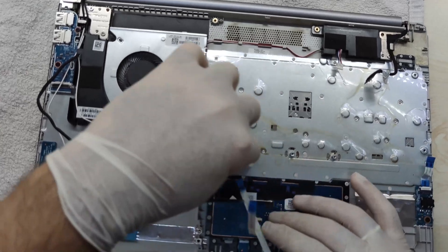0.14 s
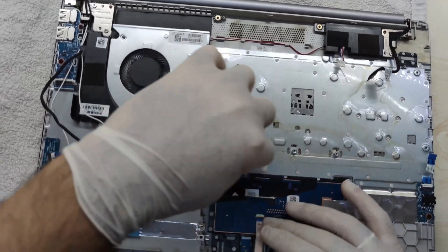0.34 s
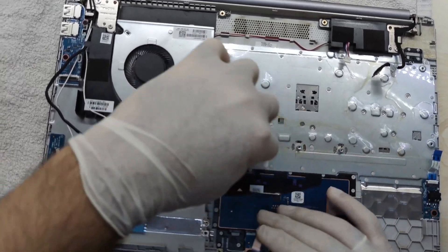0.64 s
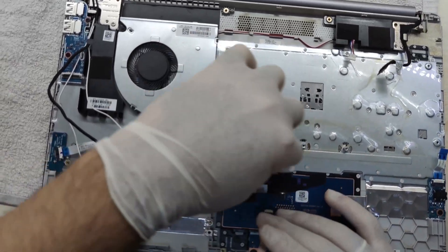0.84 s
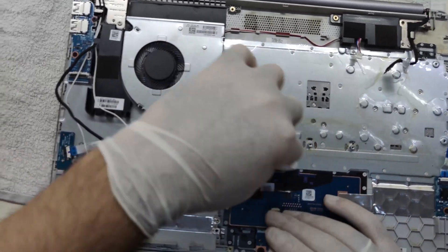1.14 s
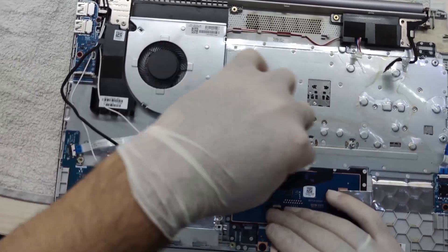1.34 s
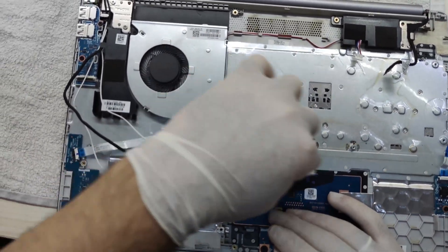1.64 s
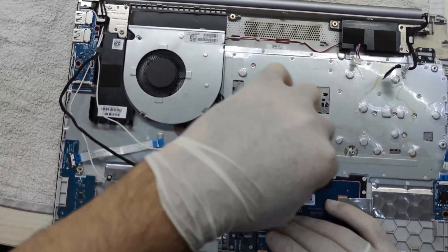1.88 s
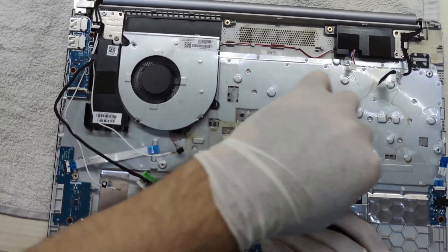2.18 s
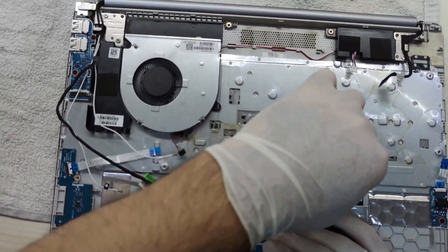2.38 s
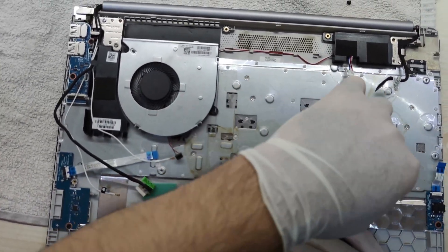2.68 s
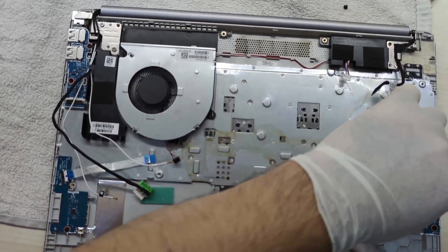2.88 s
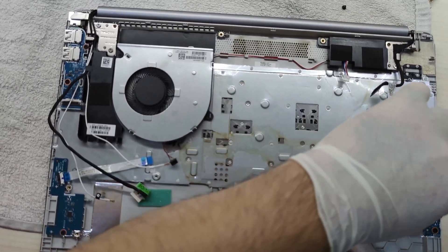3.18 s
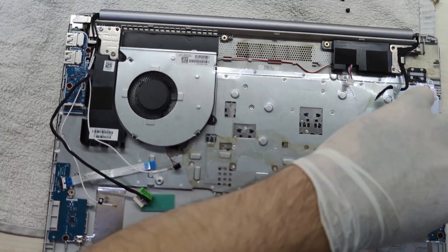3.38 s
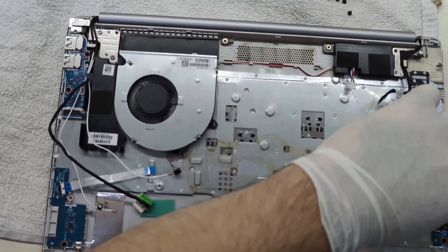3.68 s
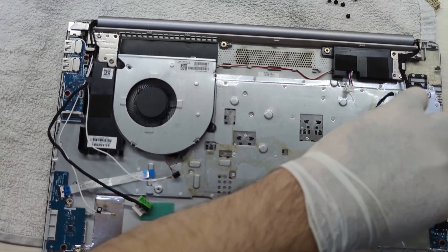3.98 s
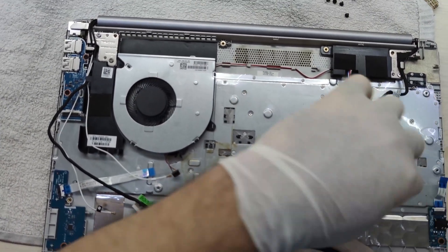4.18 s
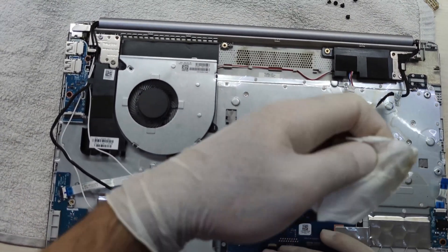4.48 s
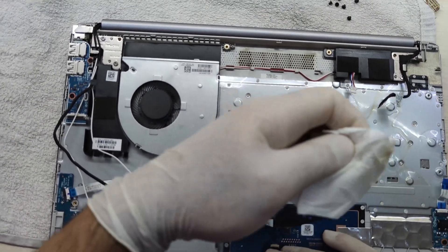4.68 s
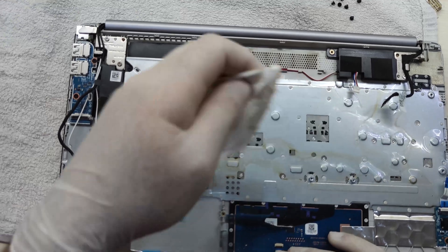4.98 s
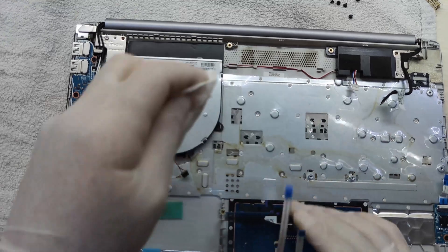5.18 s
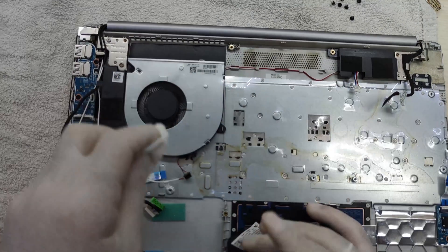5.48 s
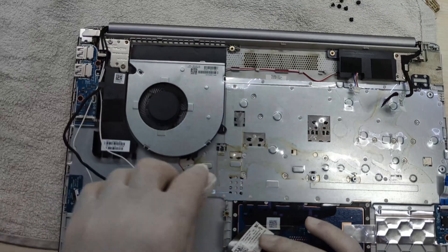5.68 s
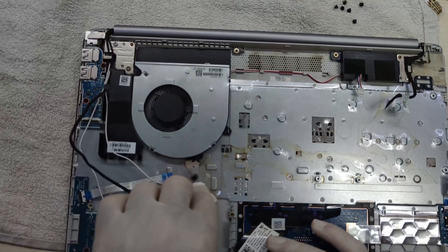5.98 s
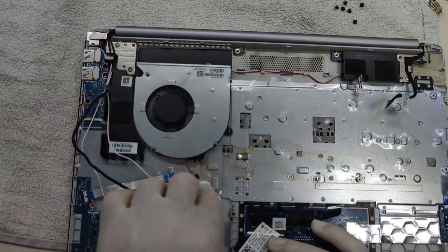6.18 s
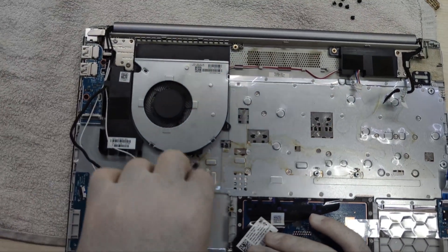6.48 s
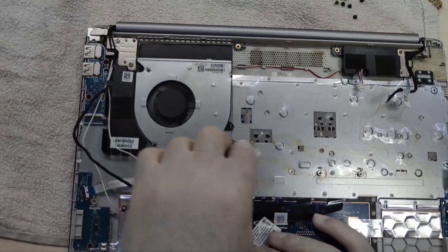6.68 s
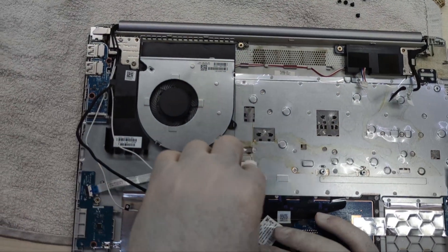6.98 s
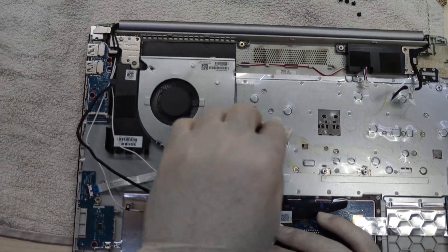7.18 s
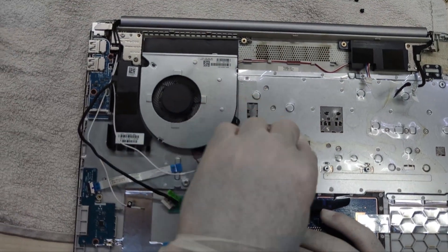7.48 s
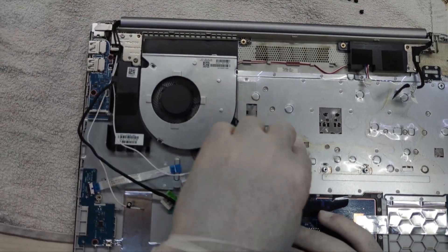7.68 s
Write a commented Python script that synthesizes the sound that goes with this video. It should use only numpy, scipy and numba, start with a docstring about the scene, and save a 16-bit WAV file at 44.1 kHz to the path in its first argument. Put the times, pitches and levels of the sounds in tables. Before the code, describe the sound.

Close above a workbench in a small dry room, a gloved hand scrubs a thin metal plate with a wipe: rapid, bright, hissy strokes, about seven per second, fading after three and a half seconds. Then come irregular clicks, short scrapes and faint glove crinkles, with a sharp loud knock near five seconds and another past six and a half. A few very soft wipes finish it over faint hum and air.

```python
"""Quick back-and-forth strokes hiss first: a gloved hand scrubs a laptop keyboard's metal backplate with a wipe.
Then it handles the open case on a workbench: keys and small parts click and scrape, before a few last strokes.
The wipe is noise made of tiny friction grains, swept by a moving resonance; contacts are short noise bursts
that ring each part and the thin chassis. Glove ticks and soft bumps add to them.
Two microphone ports close above hear it in a small dry room with a faint hum and air noise."""
import sys
import numpy as np
from scipy import signal
from scipy.fft import rfft, irfft, next_fast_len
from scipy.io import wavfile
from numba import njit

SR = 44100
rng = np.random.default_rng(int(sys.argv[2]) if len(sys.argv) > 2 else 0)


def store_wav(level_fs):
    """Save 16-bit WAV to argv[1]."""
    pcm = np.round(np.clip(np.atleast_2d(level_fs), -1, 1) * 32767)
    wavfile.write(sys.argv[1], SR, pcm.T.astype(np.int16))


N = 345728  # length in samples
SIDES = np.array([[1], [-1]])  # left, right

# Wipe strokes, back and forth: t/s, length/s, hiss level/dB before the swell,
# direction (above 0 push, below 0 pull; its size says how strongly)
STROKES = [(0.0, 0.083, -53.5, 0.84), (.104, 0.12, -59, -0.74), (.23, .11, -49, 1),
           (.366, 0.083, -47.5, -0.24), (.485, 0.096, -52, 0.89), (.634, .1, -46.5, 0.48),
           (.764, .095, -50, 0.52), (.911, .1, -45, 0.0062), (1.042, 0.11, -45, 0.14),
           (1.194, 0.12, -42, -0.83), (1.33, .13, -44, 0.77), (1.503, .11, -46, -1.5),
           (1.643, .13, -47.5, 1), (1.818, 0.074, -63.5, -0.86), (1.923, .13, -54, 1),
           (2.199, .15, -49, 0.75), (2.381, 0.098, -50.5, -0.68), (2.503, .15, -46, 1),
           (2.689, 0.1, -49, -1.4), (2.797, 0.15, -47.5, 0.93), (2.972, 0.093, -45, -1.2),
           (3.118, .11, -42, 0.026), (3.251, 0.097, -50.5, -0.18), (3.393, 0.083, -57.5, 0.74),
           (3.519, 0.095, -64, -1), (3.646, 0.094, -61.5, 0.33), (3.779, 0.092, -66.5, -0.41),
           (3.884, 0.092, -67, 0.77), (4.028, 0.115, -62.5, -1), (4.11, 0.15, -59, 1),
           (7.43, .11, -61.5, -1), (7.556, 0.12, -66, 1), (7.652, .095, -60, -0.64),
           (7.747, 0.23, -58.5, 0.69)]
# The grip and the spot being wiped tune the hiss: t/s, mid-stroke centre f/Hz,
# lower edge f/Hz before the push shift, singing at that edge level/dB,
# drag f/Hz, drag level/dB at usual effort
GRIP = [(.05, 7750, 4430, 1, 3400, -66), (.3, 7530, 3800, 2.5, 2780, -65), (.55, 7630, 3120, -9, 1530, -73),
        (1.25, 7760, 3180, 1, 1290, -69), (1.55, 7340, 4300, -8, 1180, -64),
        (1.8, 7500, 3720, 3, 1210, -61), (2.27, 8470, 5150, 4, 1970, -64),
        (2.44, 8460, 5460, 4.5, 3060, -64), (2.75, 8630, 5540, -2, 2800, -63.5),
        (2.88, 8140, 5040, 9.5, 3120, -69), (3.02, 6940, 4600, 6, 2600, -67),
        (3.18, 6930, 4460, 6, 1380, -68), (3.42, 8270, 6750, -2, 2660, -70),
        (4.2, 8090, 6500, 0, 3400, -67.5), (7.45, 7180, 6280, 5, 1488, -75),
        (7.84, 7400, 6210, 6, 1754, -71)]
# Broad hiss of the wipe around its moving centre: f/Hz, level/dB
WIPE_HISS = [(2000, -17.5), (4200, -5.5), (5200, -10), (7500, -0.5), (9500, -4.5), (12000, -9.5),
             (12500, -9), (15500, -12.5)]
# Duller drag of the pad under the finger: f/Hz, level/dB
WIPE_DRAG = [(300, -15.5), (600, -10.5), (1300, -3.5), (3300, 1), (5000, 4), (8000, -9)]
PULL_GLIDE_HZ, PUSH_GLIDE_HZ = 600, -350  # drift of the hiss from mid-stroke to its end
PUSH_BROAD_DB, PUSH_EDGE_OCT = 4.5, -0.049  # a push lays the wipe flat: a broader hiss that reaches lower
USUAL_STROKE_DB, DRAG_GROWTH = -49, 0.28  # the drag grows slowly with effort (dB per dB)
DRAG_RING_DB = 4.5  # the drag sings a little at its own pitch
WIPE_PAN_DB = -2.5  # left minus right


def wiping(width_hz, hiss_db, swell, uneven_db):
    """Fibres catch and slip on the plate; the hiss swells with stroke speed and glides with the pressure."""
    out = np.zeros((2, N))
    grip_s, *grip = np.transpose(GRIP)
    for s, length, db, direction in STROKES:
        u = np.linspace(0, 1, int(length * SR))  # progress through the stroke
        middle_s = s + length / 2
        settings = [np.interp(middle_s, grip_s, column) for column in grip]
        centre_hz, edge_hz, edge_db, drag_hz, drag_db = settings
        edge_hz = edge_hz * 2 ** (direction * PUSH_EDGE_OCT)

        grit_db = np.interp(db, [-48, -43], [2.2, 3.2])  # harder strokes catch more
        slips = friction(len(u), catch_hz=1475, grit_db=grit_db)
        grains = ports(slips[0], slips[1:], scatter_db=14, lag_ms=.1)

        glide_hz = PUSH_GLIDE_HZ if direction > 0 else PULL_GLIDE_HZ
        centre = centre_hz + glide_hz * (2 * u - 1)
        peak = np.array([moving_peak(port, centre, width_hz) for port in grains])
        broad = level(colour(grains, WIPE_HISS), hiss_db + direction * PUSH_BROAD_DB)
        hiss = level(peak, 0) + broad
        # the hiss ends steeply below an edge that changes with the grip
        hiss = colour(hiss, [(edge_hz * 0.71, -18), (edge_hz, edge_db), (min(edge_hz * 1.73, 8200), 0),
                             (9000, 0), (10000, 2), (12000, 3), (12600, -2), (15000, 0)])

        drag = friction(len(u), catch_hz=908.0, grit_db=5.5)[1:]
        singing = undb(DRAG_RING_DB) * resonate(drag, drag_hz, drag_hz / 5)
        drag = colour(drag + singing, WIPE_DRAG)
        drag_db = drag_db + DRAG_GROWTH * (db - USUAL_STROKE_DB)

        speed = np.abs(np.sin(np.pi * u)) ** swell
        stroke = (level(hiss, db) + level(drag, drag_db)) * speed
        add(out, s, pan(stroke, WIPE_PAN_DB))
    return out * undb(uneven_db * walk(70))


def moving_peak(x, centre, width_hz):
    """Two moving resonances in a row narrow the noise around a gliding centre."""
    once = sweep(x, centre, float(width_hz))
    return sweep(once, centre, float(width_hz))


# Colour difference of the wipe between the ports: f/Hz, left minus right level/dB
PLATE_BALANCE = [(1000, 7.5), (3500, 1), (5400, -6), (7200, 1.5), (8500, 9), (10000, 3), (12000, -1),
                 (13500, -5)]


def plate_reflections(wipe):
    """Reflections off the plate colour the two ports differently."""
    left = colour(wipe[0], [(hz, db / 2) for hz, db in PLATE_BALANCE])
    right = colour(wipe[1], [(hz, -db / 2) for hz, db in PLATE_BALANCE])
    return np.array([left, right])


# Clicks of keys and parts: t/s, relative level/dB, hardness (added to treble and top)/dB, part
CLICKS = [(4.211, -53, 5, "rim"), (4.458, -50, 5, "base"), (4.565, -56.5, -5, "clip"),
          (4.579, -47.5, 3.5, "clip"), (4.645, -38.5, 5, "frame"), (4.664, -42.5, -4, "frame"),
          (4.8142, -44, 0, "cable"), (4.875, -46.5, 3, "base"), (5.001, -41, 3, "frame"),
          (5.058, -20.5, -0.5, "case"), (5.17, -44, 5.5, "frame"), (5.2215, -43.5, 14, "hinge"),
          (5.241, -52, -5, "hinge"), (5.271, -54, -8, "base"), (5.323, -65, -4, "frame"),
          (5.3608, -48, -4, "frame"), (5.507, -53, 2, "frame"), (5.53, -49.5, -1.5, "base"),
          (5.703, -53.5, -21, "frame"), (5.943, -49, -1, "clip"), (5.966, -35.5, -1, "latch"),
          (6.098, -47, 6, "cable"), (6.142, -49, 2, "clip"), (6.249, -58, 3, "clip"),
          (6.41, -45, 3, "clip"), (6.443, -49.5, 5, "rim"), (6.494, -57.5, 1, "frame"),
          (6.551, -46.5, -4, "key"), (6.587, -25, 1, "plate"), (6.757, -55, -12, "key"),
          (6.8161, -40, -1.5, "key"), (6.898, -40.5, 3.5, "key"), (6.9244, -38.5, 0, "key"),
          (6.989, -51.5, 7, "hinge"), (7.008, -39, 4.5, "key")]
# How each part sounds when touched, for clicks and scrapes; by name:
# thud level/dB, treble level/dB, top level/dB, ring f/Hz, ring level/dB,
# coupling to the chassis level/dB, rattle decay t/ms, left minus right level/dB (clicks only)
PARTS = {"case": (5, 2.5, -7.5, 2231.5, 6, 2, 1.3, -2.5),
         "plate": (-0.5, -2.5, -5.5, 7051.5, 2, 4.5, 2, -2),
         "frame": (2.5, -2, -22.5, 1810, -2.5, 4, 4.5, -3), "base": (7, -9, -29, 740, 2.5, 6, 6.5, -2.5),
         "key": (-2.5, -1.5, -35, 2157, 16.5, 7.5, 3.5, -2.5),
         "clip": (-1, 5.5, -14.5, 3280, 17.5, 4.5, 4.5, -4),
         "hinge": (9.5, -1, -45, 5450, 22.5, 7, 0.3, -2.5), "cable": (-5, 10, -8.5, 8200, 3, 3, 3, -1.5),
         "latch": (-38.5, 10, 1, 11050, 9, 8, .15, 0.5), "rim": (19, 3, -2.5, 10800, 11, 5.5, 0.1, -2.5),
         "cloth": (-3, -4, -18, 1331, 15, 5.5, 3, 1), "bench": (16.5, -24, -34, 592.5, 22.5, 5, 5, -3)}
STRIKE_DB = -3  # first clean impact against the rattle, before looseness softens it


def clicking(body_s, spread_ms, gain_db):
    """A click is a dying rattle of tiny impacts, drawn out a little by the bench; harder is brighter."""
    out = np.zeros((2, N))
    t_ms = np.arange(SR // 6) / SR * 1000
    for s, db, hard_db, part in CLICKS:
        thud_db, treble_db, top_db, ring_hz, ring_db, coupling_db, rattle_ms, pan_db = PARTS[part]
        impacts = friction(len(t_ms), catch_hz=2480, grit_db=5.0)
        impacts = impacts * (1 - np.exp(-t_ms * 5 / rattle_ms))  # looser parts take a moment to seat
        direct = unit(impacts[0] * np.exp(-t_ms / rattle_ms))
        strike_at = int(SR * rattle_ms / 5000)
        direct[strike_at] += undb(STRIKE_DB - rattle_ms)  # loose parts land more softly
        scattered = impacts[1:] * np.exp(-t_ms / (rattle_ms + spread_ms))
        force = ports(direct, scattered, scatter_db=0.5, lag_ms=.47)
        sound = touch(force, thud_db, treble_db + hard_db, top_db + hard_db, ring_hz, ring_db, coupling_db)
        loudness = np.sqrt(body_s * SR) * undb(db + gain_db)
        add(out, s, pan(sound * loudness, pan_db))
    return out


# Fingers and parts sliding on the case: t/s, length/s, relative level/dB,
# hardness (added to treble and top)/dB, part
SCRAPES = [(4.194, 0.038, -50, -5, "base"), (4.198, .035, -60, -3, "cloth"),
           (4.583, 0.023, -49.5, 13, "key"), (4.628, 0.089, -42.5, -13.5, "frame"),
           (4.69, 0.095, -57, -31, "frame"), (4.72, 0.058, -45.5, -3, "bench"),
           (4.822, .051, -50, 12, "bench"), (4.872, 0.046, -48, 3, "base"), (4.968, 0.11, -55.5, 0, "base"),
           (5.193, 0.19, -58.5, -12, "base"), (5.514, 0.11, -50, -27, "base"),
           (5.534, 0.13, -53.5, -26, "frame"), (6.083, 0.13, -52.5, -6, "cable"),
           (6.082, 0.052, -46.5, -3, "cable"), (6.127, 0.04, -55.5, -3, "cloth"),
           (6.248, .096, -59, 12, "cloth"), (6.419, .035, -44.5, -2.5, "plate"),
           (6.539, 0.046, -47, 3, "key"), (6.584, 0.03, -44.5, -9.5, "cloth"),
           (6.765, 0.058, -58, -17, "frame"), (6.928, 0.043, -38.5, 6.5, "frame"),
           (7.01, 0.033, -45, -2, "key"), (7.758, 0.05, -60.5, -10.5, "cable")]


def scraping(swell, gain_db):
    """Uneven stick-slip friction crackles through the same parts and chassis."""
    out = np.zeros((2, N))
    for s, length, db, hard_db, part in SCRAPES:
        thud_db, treble_db, top_db, ring_hz, ring_db, coupling_db, _, _ = PARTS[part]
        u = np.minimum(np.arange(SR // 3) / SR / length, 1)  # stays at 1 once the slide is over
        slips = friction(len(u), catch_hz=1100, grit_db=4.8)
        slips = slips * np.abs(np.sin(np.pi * u)) ** swell
        force = ports(slips[0], slips[1:], scatter_db=6.0, lag_ms=.45)
        sound = touch(force, thud_db, treble_db + hard_db, top_db + hard_db, ring_hz, ring_db, coupling_db)
        loudness = np.sqrt(length * SR) * undb(db + gain_db)
        add(out, s, pan(sound * loudness, pan_db=-1.1))
    return out


def touch(force, thud_db, treble_db, top_db, ring_hz, ring_db, coupling_db):
    """A force rings the chassis and the touched part; unit energy at each port."""
    part = undb(ring_db) * resonate(force, ring_hz, 60 + ring_hz / 8)
    body = chassis(force, ring_db=coupling_db, place_db=2.0)
    return unit(colour(body + part, contact(thud_db, treble_db, top_db)))


# Resonances of the chassis: f/Hz, width/Hz, relative level/dB
CHASSIS = [(623, 31, -8.5), (684, 73, 4.5), (1163, 24, -5.5), (1596, 35, -8), (1830, 11, -11),
           (2240, 34, -2), (2600, 44, -6), (3220, 210, -3.5), (5100, 71, -12.5), (7185, 110, -2.5),
           (7580, 180, -6)]


def chassis(force, ring_db, place_db):
    """A contact is heard directly and through the case's resonances, each driven by where it is touched."""
    places = rng.standard_normal(len(CHASSIS))
    modes = 0
    for (hz, width, db), place in zip(CHASSIS, places):
        modes = modes + undb(db + place_db * place) * resonate(force, hz, width)
    return force + undb(ring_db) * modes


def contact(thud_db, treble_db, top_db):
    """Contact spectrum: heavy ones flex the case, hard ones reach the top; a small case radiates no bass."""
    return [(100, thud_db - 27), (380, thud_db - 23.5), (540, thud_db - 1), (780, thud_db - 4.5),
            (1000, thud_db / 4 - 3.0), (1700, 0.99), (3800, -1.97), (5000, treble_db / 2),
            (7800, treble_db), (9300, (2 * treble_db + top_db) / 3), (11000, top_db), (15500, top_db)]


def friction(size, catch_hz, grit_db):
    """Three unrelated streams of tiny slips, bunched by the same random catches."""
    chance = rng.standard_normal((4, SR // 3))[:, :size]
    catches = np.interp(np.arange(size) / SR * catch_hz, np.arange(size), chance[0])
    return chance[1:] * undb(grit_db * catches)


def ports(direct, scattered, scatter_db, lag_ms):
    """The direct sound reaches the left port late; what the bench scatters differs at each port."""
    late = np.pad(direct, (int(lag_ms * SR / 1000), 0))[:len(direct)]
    return unit(np.array([late, direct])) + undb(scatter_db) * unit(scattered)


# The gloves crinkle as the hands move: from t/s, to t/s, ticks per s, middle level/dB before the room
CRINKLES = [(4.255, 4.449, 25, -74), (5.236, 5.896, 45, -73.5)]


def crinkling(spread_db, tick_ms):
    """Faint, dry ticks of thin glove rubber: dying noise bursts at random moments."""
    out = np.zeros((2, N))
    t_ms = np.arange(SR // 50) / SR * 1000
    for start, end, rate, db in CRINKLES:
        count = int((end - start) * rate)
        for moment, size in rng.random((count, 2)):
            tick = rng.standard_normal((2, len(t_ms))) * np.exp(-t_ms / tick_ms)
            tick = colour(tick, [(800, -10), (2500, -8), (5500, -9.5), (8500, -13), (14000, -47)])
            tick = level(tick, db + spread_db * (2 * size - 1))
            add(out, start + moment * (end - start), tick)
    return out


# The case rocks on its padded bench: t/s, length/s, f/Hz, level/dB
BUMPS = [(.39, .07, 114, -67.5), (.99, .07, 385, -74.5), (1.34, .09, 524, -75), (2.58, .09, 72, -62.5),
         (4.735, .11, 270, -63), (5.06, .072, 137.6, -69), (6.595, .05, 171, -72),
         (6.84, .082, 68.2, -61.5)]


def bumping(width_share):
    """Soft, heavily damped thumps of the whole case: noise through two broad resonances."""
    out = np.zeros((2, N))
    for s, length, hz, db in BUMPS:
        push = resonate(rng.standard_normal(SR // 2), hz, hz * width_share)
        push = resonate(push, hz, hz * width_share)
        size = int(length * SR)
        add(out, s, level(push[-size:] * np.hanning(size), db))
    return out


# Room hum: middle f/Hz, level/dB, left minus right level/dB
HUM = [(178.5, -83, -5.5), (223.7, -71.5, 5.5), (314.5, -73.5, 0.5), (457, -85, -0.5)]


def hum(waver_hz, flutter_db):
    """A few low motor tones whose pitch and level waver slightly."""
    out = 0
    for hz, db, pan_db in HUM:
        phase = 2 * np.pi * np.cumsum(hz + waver_hz * walk(25)) / SR
        tone = np.sin(phase) * undb(flutter_db * walk(9))
        out = out + pan(level(tone, db), pan_db)
    return out


# Colour of the room air: f/Hz, relative level/dB
AIR = [(12, -9.5), (27, 2), (35, -14.5), (45, -15.5), (65, -20), (110, -27), (170, -36), (330, -26.5),
       (520, -37), (1100, -41), (2500, -43.5), (5500, -51), (7600, -45), (9500, -51), (15000, -52.5)]
# Likeness of the air at the two ports: f/Hz, correlation
AIR_LIKENESS = [(30, 0.93), (120, 0.65), (300, .55), (700, 0.081), (2000, .03)]
AIR_DB = -56.5


def air():
    """Low rumble shared by both ports under a thin, diffuse hiss."""
    mid, side = rfft(rng.standard_normal((2, N)))
    likeness = along(AIR_LIKENESS, N)
    shared = mid * np.sqrt(1 + likeness)
    opposed = SIDES * side * np.sqrt(1 - likeness)
    return level(colour(irfft(shared + opposed, N), AIR), AIR_DB)


def room(x, wet_db, t60_s, dull_db):
    """A short, diffuse tail follows the near sound; the walls swallow the top."""
    t = np.arange(SR // 2) / SR
    decay = undb(-60 * t / t60_s) * (1 - np.exp(-t / 0.0013))
    tail = unit(rng.standard_normal((2, len(t))) * decay)
    tail = colour(tail, [(500, 1.2), (1200, 1.4), (2200, -0.18), (4000, -1.5), (7500, -0.39), (12000, dull_db)])
    wet = signal.fftconvolve(x, tail, axes=1)[:, :N]
    return (x + undb(wet_db) * wet) / np.hypot(1, undb(wet_db))


def undb(db):
    """Decibels to gain."""
    return 10 ** (np.asarray(db) / 20)


def unit(x):
    """Scale to an energy of one."""
    return x / np.sqrt(np.sum(x ** 2, axis=-1, keepdims=True))


def level(x, db):
    """Scale to an rms level."""
    return x * undb(db) / np.sqrt(np.mean(x ** 2))


def along(points, size):
    """Read (Hz, value) points at the bins of a spectrum, on a log axis."""
    hz, value = np.transpose(points)
    bins_hz = np.arange(size // 2 + 1) * SR / size
    return np.interp(np.log(bins_hz + 1), np.log(hz), value)  # + 1 avoids the log of zero


def colour(x, points):
    """Causal filter through (Hz, dB) points."""
    size = 2 * next_fast_len(x.shape[-1])
    cepstrum = irfft(np.log(undb(along(points, size))))
    # folding the cepstrum forward makes the filter respond only after its input
    cepstrum[1:size // 2] *= 2
    cepstrum[size // 2 + 1:] = 0
    response = np.exp(rfft(cepstrum))
    return irfft(rfft(x, size) * response)[..., :x.shape[-1]]


def resonate(x, hz, width_hz):
    """A fixed resonance, gain 1 at its centre."""
    return signal.lfilter(*signal.iirpeak(hz, hz / width_hz, fs=SR), x)


@njit
def sweep(x, hz, width):
    """A resonance whose centre moves."""
    y, band, low = np.empty(len(x)), 0., 0.
    for i in range(len(x)):
        g, k = np.tan(np.pi * hz[i] / SR), width / hz[i]  # tuning, damping
        v = (band + g * (x[i] - low)) / (1 + g * (g + k))
        band, low, y[i] = 2 * v - band, low + 2 * g * v, k * v
    return y


def add(track, s, x):
    """Mix a sound in at a time."""
    start = max(int(s * SR), 0)
    x = x[..., :N - start]
    track[..., start:start + x.shape[-1]] += x


def walk(rate):
    """Slow chance: random values, rate of them per second, joined by straight lines."""
    return np.interp(np.arange(N) / SR * rate, np.arange(N), rng.standard_normal(N))


def pan(x, pan_db):
    """Share a sound between left and right at constant power."""
    gains = undb(SIDES * pan_db / 2)
    return x * gains / np.sqrt(np.mean(gains ** 2, axis=0))


def scene():
    """Wiping and handling on the bench, over the room's hum and air."""
    wipe = wiping(width_hz=2880, hiss_db=-5.5, swell=0.82, uneven_db=2.5)
    wipe = plate_reflections(room(wipe, wet_db=1, t60_s=0.095, dull_db=-3.5))
    handling = clicking(body_s=0.016, spread_ms=1.0, gain_db=2.5)
    handling = handling + scraping(swell=0.4, gain_db=-2.5)
    handling = handling + crinkling(spread_db=2.5, tick_ms=0.72)
    handling = room(handling, wet_db=-3, t60_s=0.17, dull_db=-5.5)
    background = hum(waver_hz=2.2, flutter_db=3.0) + air()
    return wipe + handling + bumping(width_share=0.3) + background


TOP_HZ = 15900


def record(dry):
    """The recorder cuts the top with a steep low-pass filter."""
    return signal.sosfilt(signal.ellip(10, .2, 80, TOP_HZ, fs=SR, output="sos"), dry)


dry = scene()
out = record(dry)
store_wav(out)
```